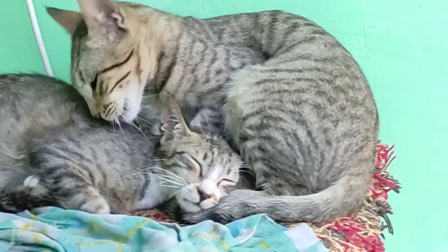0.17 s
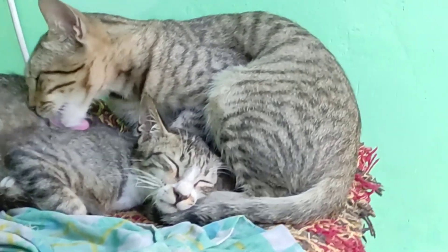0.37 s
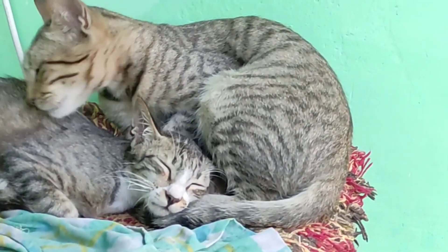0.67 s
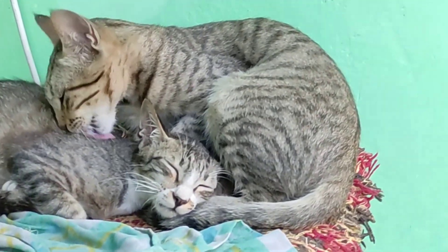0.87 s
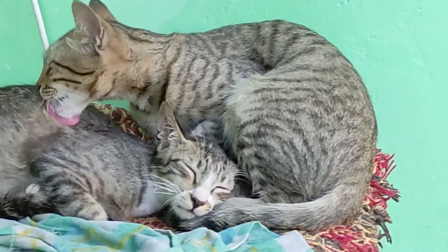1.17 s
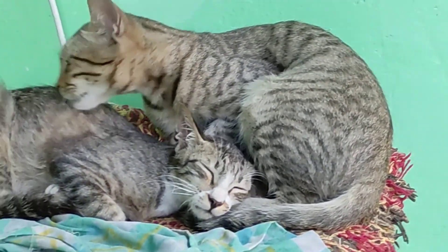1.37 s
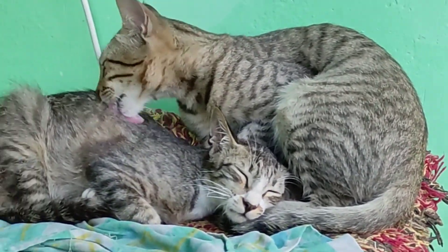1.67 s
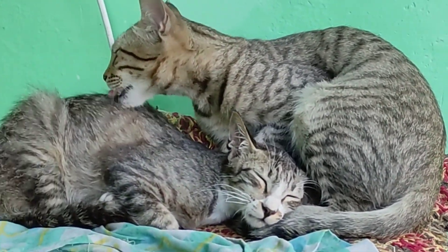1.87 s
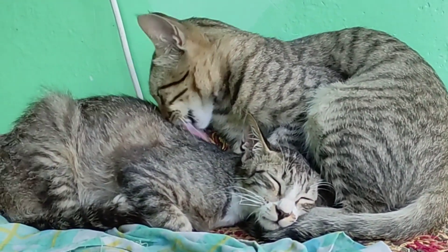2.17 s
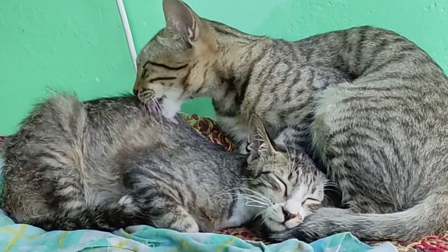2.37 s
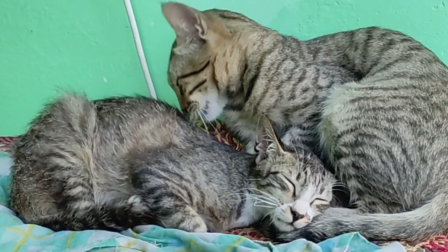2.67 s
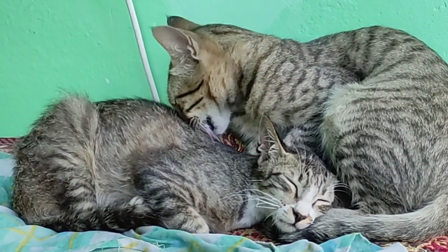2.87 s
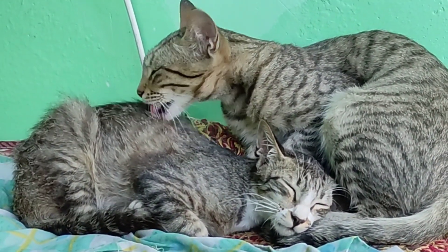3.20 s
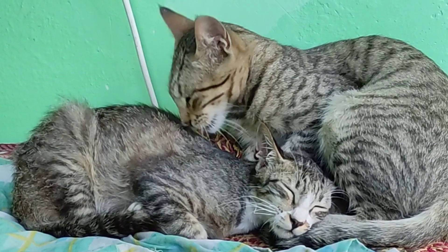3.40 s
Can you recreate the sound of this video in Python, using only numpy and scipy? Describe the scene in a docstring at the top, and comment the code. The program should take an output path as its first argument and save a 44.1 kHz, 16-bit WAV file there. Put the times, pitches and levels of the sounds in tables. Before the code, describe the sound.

A cat's rough tongue grooms fur, very close, about three licks a second. Soft brushing and scattered wet clicks open; fuller rasps come near 0.75 and 1.3 s. A tiny run of squeaky chirps at 1.8-1.95 s ends in a wet snap. Stronger rasps and sharp clicks follow from 2.3 to 3.5 s. Dull low bumps and a faint, steady room rumble and hum lie beneath.

```python
"""A cat's barbed tongue grooms another cat, about three licks a second, close by in a quiet room.
Its barbs flick free in wet rasps coloured by mouth and teeth; hairs slip off in a dry, wide hiss.
Breaking saliva films ring as tiny clicks, and stick-slip of the tongue squeaks in a run of chirps.
The nodding head bumps the other cat as low, sagging tones; presses rub dully.
Under it lie steady filtered noise and a low hum."""
import sys
import numpy as np
from scipy import signal
from scipy.io import wavfile

SR = 44100
rng = np.random.default_rng(int(sys.argv[2]) if len(sys.argv) > 2 else 0)


def transcribe(u):
    """Save the signal u as a 16-bit wav file named by the first command-line argument.

    u: samples, shape (n,) or (channels, n), limited to [-1, 1]; the rate is SR.
    q: integer samples, one column per channel.
    """
    v = np.clip(np.atleast_2d(u).T, -1, 1)
    q = np.round(v * 32767).astype(np.int16)
    wavfile.write(sys.argv[1], SR, q)


N = 156114
TIME = np.arange(N) / SR  # seconds

# In the event tables, rise, fall and half length are the times over which a swell drops to exp(-1/2).
# Wet rasps of the tongue; the resonances are those at the peak, mouth_db is relative to level_db:
# peak_s, rise_s, fall_s, level_db, mouth_hz, mouth_db, teeth_hz, glide_octaves_per_s
RASP_STROKES = [(.03, 0.02, 0.022, -54.5, 2260, -3, 7150, 2), (.757, 0.028, 0.024, -47, 2600, -7, 6200, 2),
                (.76, 0.074, 0.033, -58, 2580, 5, 5900, 2.5),
                (1.085, 0.039, 0.029, -58.5, 2030, 3.5, 5730, -0.5),
                (1.3, 0.038, 0.045, -49, 2320, -6.5, 6100, -0.5),
                (1.322, 0.0071, 0.0076, -37.5, 2410, -4.5, 5740, 2),
                (1.688, 0.021, .026, -57, 1900, 5, 5700, 1), (1.93, 0.058, 0.037, -48, 2340, -8.5, 6300, 2),
                (1.944, 0.0061, 0.0033, -35.5, 2370, -8, 6400, 1),
                (2.17, 0.036, .04, -51.5, 1950, -16, 6300, -0.5),
                (2.306, 0.039, 0.023, -49.5, 1860, 0, 5500, -2.5),
                (2.468, 0.016, 0.0079, -53, 2130, 2.5, 5900, 13),
                (2.533, 0.032, 0.017, -45.5, 2210, -3, 6840, -2),
                (2.867, 0.054, 0.026, -43, 1640, -2.5, 5840, -1.5),
                (3.075, 0.028, 0.04, -49, 2360, -3, 6950, 2.5),
                (3.128, 0.0075, 0.0096, -42, 2370, -8, 6500, -4),
                (3.478, 0.046, 0.018, -45.5, 1720, -0.5, 5740, -0.8)]
# Strokes through dry fur; underfur_db is relative to level_db:
# peak_s, rise_s, fall_s, level_db, underfur_db
FUR_STROKES = [(.11, 0.034, 0.049, -54.5, 2), (.285, 0.052, 0.036, -49.5, -7), (.4, 0.054, 0.046, -51, -2),
               (.72, 0.18, 0.063, -56.5, -0.5), (.894, 0.094, 0.019, -54, -11),
               (.965, 0.036, 0.083, -45.5, -14), (1.32, 0.11, 0.39, -55.5, -3.5),
               (1.56, 0.048, 0.026, -46, -13.5), (1.66, 0.025, 0.036, -50, -6.5),
               (1.885, 0.042, 0.048, -61, 7), (2.175, 0.069, 0.043, -50.5, -5.5),
               (2.29, 0.035, 0.034, -50.5, -4.5), (2.53, 0.081, 0.041, -52, -2.5),
               (2.75, 0.078, 0.11, -49.5, -6.5), (2.892, 0.036, 0.018, -43.5, -4.5),
               (3.11, 0.096, 0.025, -55.5, 2.5), (3.33, 0.1, 0.074, -51, -5.5),
               (3.47, 0.052, 0.052, -48.5, -8.5)]
# Bursting saliva films; level_db is that of the ring's peak, snap_db is relative to it:
# start_s, level_db, pitch_hz, t60_s, snap_db
SALIVA_CLICKS = [(0.062, -30, 1070, 0.0044, -1), (0.0636, -32.5, 2710, 0.0025, 3),
                 (0.1006, -39.5, 495, 0.012, 12.5), (.1073, -30, 11400, 0.0011, -15),
                 (0.1193, -34.5, 4960, 0.0036, -13), (0.2885, -34.5, 6200, 0.0011, 3),
                 (0.3949, -32.5, 7260, 0.003, -12), (.3949, -32.5, 12100, .0012, -14),
                 (0.4528, -26, 2040, 0.0086, 3), (.453, -26, 690, 0.002, 0),
                 (0.5595, -39, 4970, 0.00059, 12), (.5762, -51, 2200, 0.0023, 22),
                 (.5821, -36, 7150, .003, -10), (0.6639, -36.5, 2680, 0.0024, -11),
                 (0.6705, -25.5, 7600, 0.0011, -9), (0.6971, -30.5, 5500, 0.0052, 0),
                 (0.807, -32, 6300, 0.0019, -14), (.8231, -20, 7300, 0.00085, -39),
                 (0.8915, -30.5, 11500, 0.0012, -10), (0.897, -38, 6000, 0.00091, -10),
                 (1.009, -26.5, 11900, 0.0011, -13), (1.1123, -34, 8800, 0.0019, -15),
                 (1.138, -28, 4420, 0.0053, 3), (1.206, -37, 13700, 0.0016, -18),
                 (1.263, -37, 5800, .003, -5), (1.3175, -21.5, 6140, 0.0023, -0.5),
                 (1.7907, -32, 3530, 0.0017, -24), (1.7931, -42.5, 2480, 0.0087, 17),
                 (1.8582, -39, 2080, 0.007, 18), (1.8853, -33, 5800, 0.0014, 6),
                 (1.932, -26, 5900, 0.0038, 1.5), (1.9425, -28, 4870, 0.0053, -13),
                 (1.9436, -18.5, 6160, 0.0038, -32), (1.945, -31, 13300, 0.0024, -20),
                 (2.1753, -36, 13300, 0.0023, 9), (2.3363, -27.5, 5500, 0.00088, -26),
                 (2.3703, -36.5, 5370, 0.002, -12), (2.4092, -26.5, 3980, 0.0027, -34),
                 (2.412, -36.5, 12000, .0015, -15), (2.4148, -28, 5200, 0.002, -30),
                 (2.4661, -29.5, 5700, 0.0023, 1), (2.4696, -31.5, 8240, 0.002, -1),
                 (2.5288, -20.5, 6950, 0.00096, -25), (2.5326, -21.5, 6300, 0.00094, -26),
                 (2.5939, -32, 14100, 0.00084, -7), (2.621, -36, 6500, 0.0014, -12),
                 (2.6212, -35, 12500, .001, -10), (2.7509, -16, 9900, 0.00023, -27),
                 (2.8473, -33, 6150, 0.0018, -10), (2.9521, -41.5, 4460, 0.0046, -15),
                 (3.012, -22, 4700, 0.0013, -34), (3.0247, -18, 7200, 0.0031, 8.5),
                 (3.0622, -27, 7600, 0.0025, -18), (3.0709, -27.5, 6400, 0.0028, -15),
                 (3.0828, -27, 8200, .003, 0), (3.1216, -34, 6500, .002, -14),
                 (3.1309, -20, 6270, 0.0014, -19), (3.2549, -16.5, 6720, 0.002, -36),
                 (3.5199, -38.5, 3500, 0.0015, 1)]
# Soft bumps of head on body; the pitch is that at mid-sag:
# peak_s, half_length_s, level_db, pitch_hz
HEAD_BUMPS = [(0.117, 0.025, -42.5, 166.6), (0.314, 0.019, -43.5, 69.6), (0.725, 0.031, -50.5, 70),
              (1.005, 0.044, -44.5, 68), (1.603, 0.029, -43, 62), (1.886, 0.015, -45, 58.6),
              (2.522, 0.058, -49.5, 65.5), (2.766, 0.073, -47, 65), (3.112, 0.016, -47, 65),
              (3.404, 0.063, -46, 62)]
# Tongue pressing into the coat: peak_s, half_length_s, level_db
TONGUE_PRESSES = [(0.98, .017, -47), (1.045, 0.0034, -55), (1.574, .015, -48.5)]
# Chirps of the wet tongue: peak_s, half_length_s, pitch_hz, level_db
SQUEAK_CHIRPS = [(1.815, 0.0058, 2840, -48), (1.837, 0.0066, 2920, -45.5), (1.869, 0.0066, 2900, -48.5),
                 (1.892, .0035, 2850, -47), (1.906, .004, 2430, -47), (1.928, 0.0066, 2303, -53),
                 (1.94, 0.0032, 2399, -45.5)]

# Relative spectrum of the wet barbs: frequency_hz, density_db_per_hz
RASP_SPECTRUM = [(300, -34), (1200, -42), (2400, -4), (3400, -2.5), (4700, -0.5), (5800, 8), (7000, -7),
                 (8000, 3.5), (9500, -17.5), (16000, -9)]
# Relative spectrum of the slipping hair tips: frequency_hz, density_db_per_hz
FUR_SPECTRUM = [(200, -19), (900, -13.5), (2000, 1), (3400, -8.5), (5600, 3.5), (7500, -1), (10000, -7),
                (15500, -6)]
# Relative spectrum of the dull underfur: frequency_hz, density_db_per_hz
UNDERFUR_SPECTRUM = [(60, 2.5), (200, 1.5), (500, 3), (1300, -0.5), (2200, -3), (3500, -10), (16000, -33)]
# Relative spectrum of the broad snap of a click: frequency_hz, density_db_per_hz
SNAP_SPECTRUM = [(200, -1), (450, -17), (750, 2.5), (2500, 1.5), (4000, -1), (7000, -3), (10000, -17),
                 (16000, -6)]
# Relative spectrum of the room's noise: frequency_hz, density_db_per_hz
ROOM_SPECTRUM = [(12, -20), (22, 0.5), (66, 1.5), (130, -1.5), (180, -8), (310, -9.5), (450, -13),
                 (1200, -20.5), (2200, -27), (3800, -26.5), (5700, -36), (7300, -29.5), (10000, -31.5),
                 (15500, -36.5)]

ROOM_DB = -51
HUM_HZ, HUM_WIDTH_HZ, HUM_DB = 62, 21.6, -59
SWELL_POWER = 1.73  # exponent of the stroke shape; 2 would be a Gaussian
BARBS_PER_S, BARB_SPREAD_DB = 3400, 1.4  # mean rate; spread per unit of an exponential draw
HAIRS_PER_S, HAIR_SPREAD_DB = 22000, 2.5
CLUMP_HZ, CLUMP_DB = 213, 2.5  # barbs and hairs let go in tufts
DRAG_HZ, DRAG_DB = 30.3, 1.5  # the tongue catches and slides unevenly
MOUTH_WIDTH_HZ = 540
TEETH_WIDTH_HZ, TEETH_SHARE = 1540, 0.44  # share of the bright band's power
SNAGS_PER_S, SNAG_DB = 100, -62  # level over the whole scene
CLICK_RISE_S, CLICK_ECHO_DB, CLICK_ECHO_T60_S = 0.00007, -11, 0.0044
CLICK_UPPER_RATIO, CLICK_UPPER_DB = 1.26, -20.5  # second mode, relative to the first
CLICK_BASS_CUT = 0.51  # high-pass edge as a multiple of the pitch
BUMP_SAG, BUMP_WAVER = 0.18, 0.307  # shares of the pitch
BUMP_WIDTH, BUMP_SCUFF_DB = 0.755, -10  # share of the pitch; relative level
PRESS_HZ, PRESS_WIDTH_HZ = 1260, 1340
SQUEAK_WAVER, SQUEAK_WAVER_HZ = 0.01, 77  # share of the pitch; rate
SQUEAK_FRAY_DB, SQUEAK_FRAY_HZ = 3, 250
WALL_DB, WALL_T60_S = -24, 0.12
EDGE_HZ = 15550


def amp(db):
    """Logarithmic level: 20 dB is a factor of ten in pressure."""
    return 10 ** (np.asarray(db) / 20)


def unit(x):
    """Normalisation to unit root-mean-square pressure."""
    return x / np.sqrt(np.mean(x ** 2) + 1e-20)


def add(mix, start_s, sound):
    """Superposition: pressures sum, here from a given start time."""
    part = mix[max(round(start_s * SR), 0):][:len(sound)]
    part += sound[:len(part)]


def colour(x, points):
    """Minimum-phase filtering: the phase follows from the log gain by the Hilbert transform."""
    points_hz, points_db = np.transpose(points)
    hz = abs(np.fft.fftfreq(8192, 1 / SR))
    gain_db = np.interp(np.log(hz + 1), np.log(points_hz), points_db)
    log_gain = np.log(amp(gain_db))
    taps = np.fft.ifft(np.exp(np.conj(signal.hilbert(log_gain)))).real
    causal_taps = taps[:len(taps) // 2]
    return signal.fftconvolve(x, causal_taps)[:len(x)]


def resonate(x, hz, width_hz):
    """Damped resonance: a double pole in a frame turning at a fixed or moving frequency."""
    turn = np.exp(2j * np.pi * np.cumsum(hz * np.ones(len(x))) / SR)
    radius = np.exp(-np.pi * width_hz / SR)
    poles = [1, -2 * radius, radius * radius]
    smooth = signal.lfilter([(1 - radius) ** 2], poles, x / turn + 1e-18)
    return (turn * smooth).real


def wander(rate_hz):
    """Low-passed random fluctuation: a smooth curve of rms 1."""
    return unit(resonate(rng.standard_normal(N), 0, 2 * rate_hz))


def swell(peak, rise, fall):
    """Contact pressure of one stroke: growth to a peak, then release."""
    scale = np.where(TIME < peak, rise, fall)
    return np.exp(-abs((TIME - peak) / scale) ** SWELL_POWER / 2)


def grains(per_s, spread_db):
    """Random impulse train: tiny snaps of uneven size, strengthened in tufts and by uneven drag."""
    size = amp(spread_db * np.minimum(rng.exponential(1, N), 4))
    bunching = amp(CLUMP_DB * wander(CLUMP_HZ) + DRAG_DB * wander(DRAG_HZ))
    sign = rng.choice([-1, 1], N)
    released = rng.random(N) < per_s / SR
    return size * bunching * sign * released


def room_tone():
    """Stationary noise: filtered hiss and rumble, with a narrow band heard as a wavering hum."""
    air = unit(colour(rng.standard_normal(N), ROOM_SPECTRUM))
    hum = unit(resonate(rng.standard_normal(N), HUM_HZ, HUM_WIDTH_HZ))
    return amp(ROOM_DB) * air + amp(HUM_DB) * hum


def rasps():
    """Source and filter: barbs flick free and excite resonances that glide together with the jaw."""
    out = np.zeros(N)
    for peak, rise, fall, db, mouth_hz, mouth_db, teeth_hz, glide in RASP_STROKES:
        barbs = grains(BARBS_PER_S, BARB_SPREAD_DB)
        jaw = 2 ** (glide * np.clip(TIME - peak, -2 * rise, 2 * fall))
        teeth = unit(resonate(barbs, teeth_hz * jaw, TEETH_WIDTH_HZ))
        wide = unit(colour(barbs, RASP_SPECTRUM))
        bright = unit(np.sqrt(1 - TEETH_SHARE) * wide + np.sqrt(TEETH_SHARE) * teeth)
        hollow = amp(mouth_db) * unit(resonate(barbs, mouth_hz * jaw, MOUTH_WIDTH_HZ))
        out += amp(db) * swell(peak, rise, fall) * (bright + hollow)
    return out


def brushes():
    """Frictional release: hairs slip in a fine hiss, a few snag and tick, and the underfur rubs."""
    tip_power, deep_power = np.zeros(N), np.zeros(N)
    for peak, rise, fall, db, underfur_db in FUR_STROKES:
        stroke = swell(peak, rise, fall)
        tip_power += (amp(db) * stroke) ** 2
        deep_power += (amp(db + underfur_db) * stroke) ** 2
    tips, deep = np.sqrt(tip_power), np.sqrt(deep_power)
    ticks = colour(grains(SNAGS_PER_S, HAIR_SPREAD_DB), FUR_SPECTRUM)
    snags = amp(SNAG_DB) * unit(np.sqrt(tips) * ticks)
    hiss = unit(colour(grains(HAIRS_PER_S, HAIR_SPREAD_DB), FUR_SPECTRUM))
    rub = unit(colour(rng.standard_normal(N), UNDERFUR_SPECTRUM))
    return tips * hiss + snags + deep * rub


def click(db, hz, t60, snap_db):
    """Impulse response: a breaking film snaps, a pocket rings in two modes, surfaces scatter it."""
    t = np.arange(SR // 40) / SR
    lower = np.sin(2 * np.pi * hz * t)
    upper = amp(CLICK_UPPER_DB) * np.sin(2 * np.pi * CLICK_UPPER_RATIO * hz * t)
    onset = 1 - np.exp(-t / CLICK_RISE_S)
    ring = (lower + upper) * onset * np.exp(-np.log(1000) * t / t60)
    # A tiny pocket radiates little bass.
    ring = signal.lfilter(*signal.butter(2, CLICK_BASS_CUT * hz, "high", fs=SR), ring)
    snap = colour(1.0 * (t == 0), SNAP_SPECTRUM)
    pop = ring / abs(ring).max() + amp(snap_db) * snap / abs(snap).max()
    scatter = rng.standard_normal(len(t)) * t * np.exp(-np.log(1000) * t / CLICK_ECHO_T60_S)
    echo = signal.fftconvolve(pop, scatter / np.linalg.norm(scatter))[:len(t)]
    return amp(db) * (pop + amp(CLICK_ECHO_DB) * echo)


def saliva():
    """Superposed transients: the wet clicks of tongue and lips."""
    out = np.zeros(N)
    for start_s, *shape in SALIVA_CLICKS:
        add(out, start_s, click(*shape))
    return out


def bumps():
    """Yielding contact: each push falls in pitch as the fur gives, with a scuff an octave above."""
    out = np.zeros(N)
    for peak, half, db, hz in HEAD_BUMPS:
        give = 1 - BUMP_SAG * np.tanh((TIME - peak) / half)
        waver = 1 + BUMP_WAVER * wander(BUMP_WIDTH * hz / 2)
        turns = np.cumsum(hz * give * waver) / SR
        thud = unit(np.sin(2 * np.pi * turns))
        scuff = unit(resonate(rng.standard_normal(N), 2 * hz, 3 * hz))
        out += amp(db) * swell(peak, half, half) * (thud + amp(BUMP_SCUFF_DB) * scuff)
    return out


def presses():
    """Resonant friction: the flat of the tongue digs into the coat in a short, dull, grainy rub."""
    push = sum(amp(db) * swell(peak, half, half) for peak, half, db in TONGUE_PRESSES)
    barbs = grains(BARBS_PER_S, BARB_SPREAD_DB)
    return push * unit(resonate(barbs, PRESS_HZ, PRESS_WIDTH_HZ))


def squeak():
    """Stick-slip oscillation: the wet tongue chirps, frayed, jumping from one pitch to the next."""
    peaks, _, pitches, _ = np.transpose(SQUEAK_CHIRPS)
    nearest = abs(TIME[:, None] - peaks).argmin(axis=1)
    waver = 1 + SQUEAK_WAVER * wander(SQUEAK_WAVER_HZ)
    turns = np.cumsum(pitches[nearest] * waver) / SR
    fray = amp(SQUEAK_FRAY_DB * wander(SQUEAK_FRAY_HZ))
    tone = unit(np.sin(2 * np.pi * turns) * fray)
    chirps = sum(amp(db) * swell(peak, half, half) for peak, half, _, db in SQUEAK_CHIRPS)
    return chirps * tone


def walls(x):
    """Reverberation: convolution with exponentially decaying noise gives a faint, short tail."""
    t = TIME[:SR // 2]
    tail = rng.standard_normal(len(t)) * np.exp(-np.log(1000) * t / WALL_T60_S)
    reverb = signal.fftconvolve(x, tail / np.linalg.norm(tail))[:N]
    return x + amp(WALL_DB) * reverb


def scene():
    """Superposition of the grooming and its room, alike in both channels."""
    background = room_tone() + bumps()
    grooming = rasps() + brushes() + presses() + squeak() + saliva()
    mono = background + walls(grooming)
    return np.array([mono, mono])


def record(dry):
    """Band limitation: a linear-phase low-pass removes the highest treble."""
    taps = signal.firwin(401, EDGE_HZ, window=("kaiser", 8), fs=SR)
    return signal.oaconvolve(dry, taps[None], "same")


dry = scene()
out = record(dry)
transcribe(out)
```